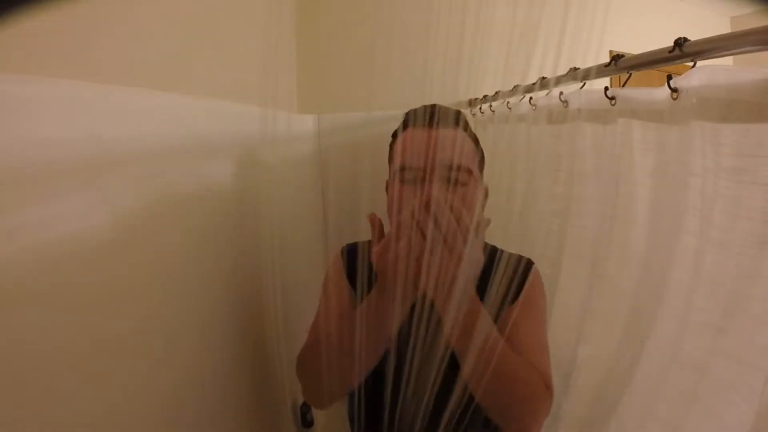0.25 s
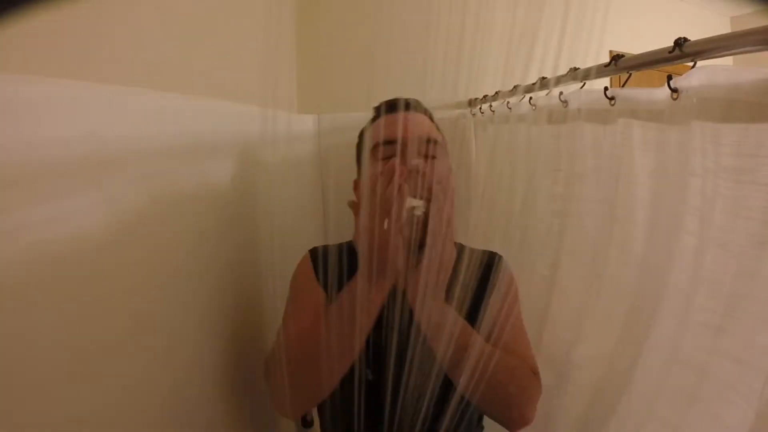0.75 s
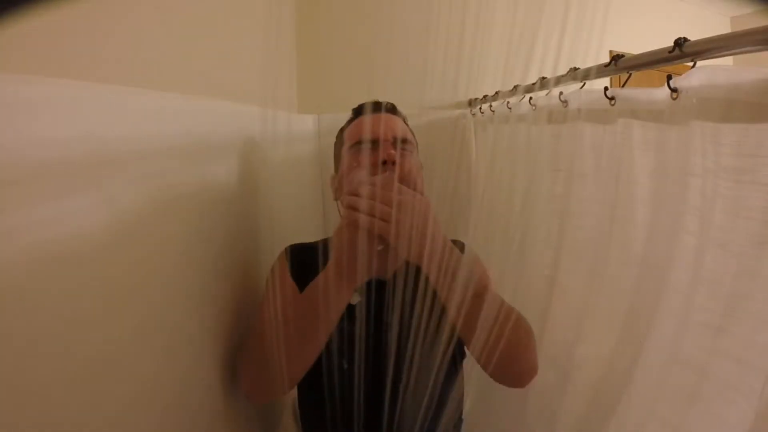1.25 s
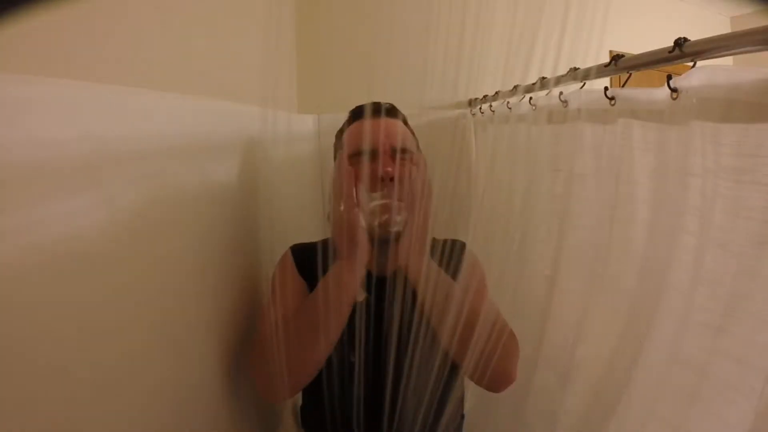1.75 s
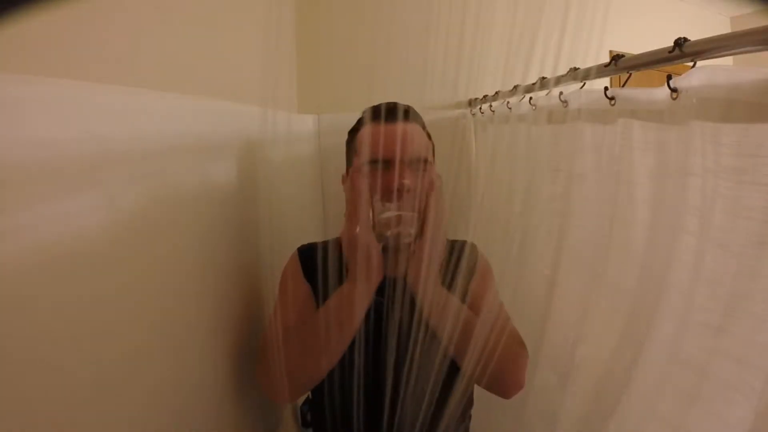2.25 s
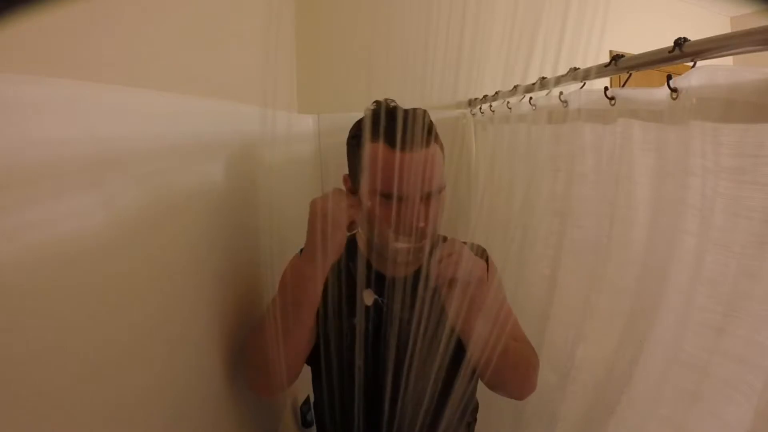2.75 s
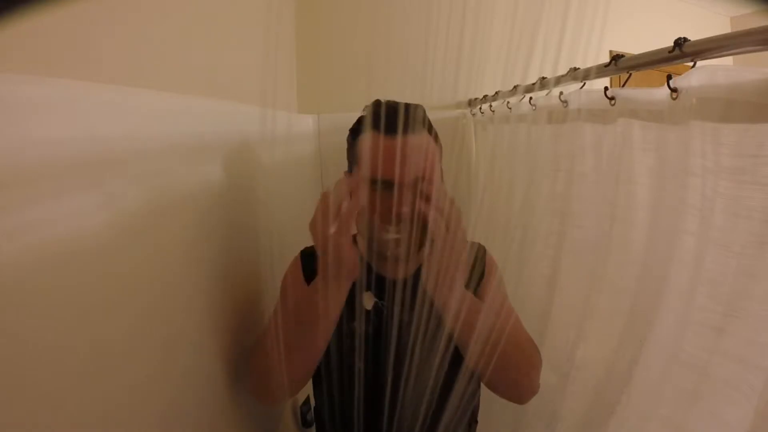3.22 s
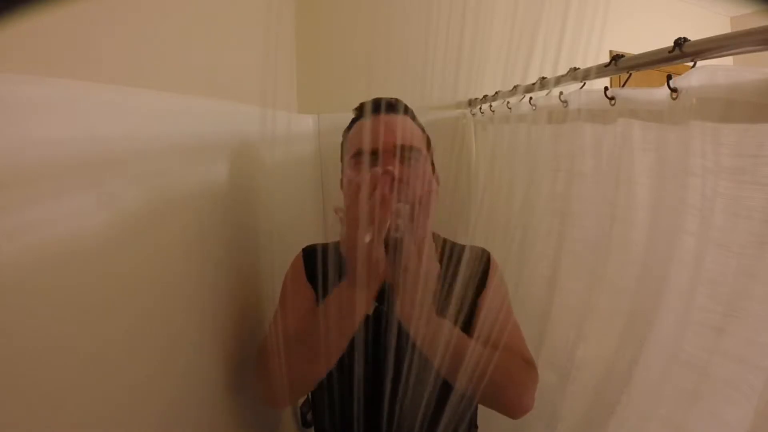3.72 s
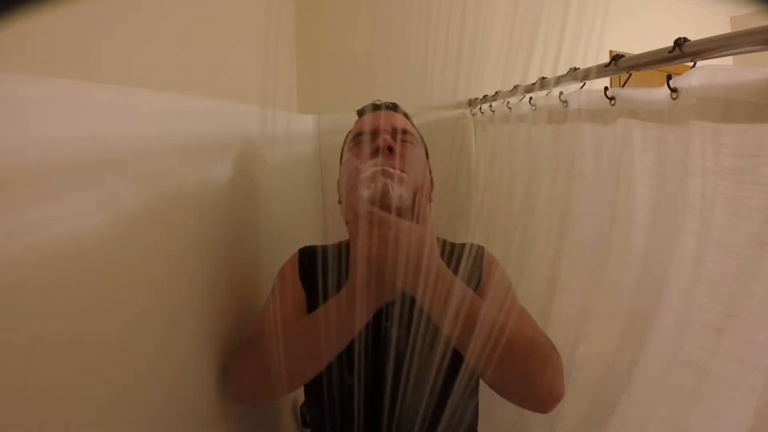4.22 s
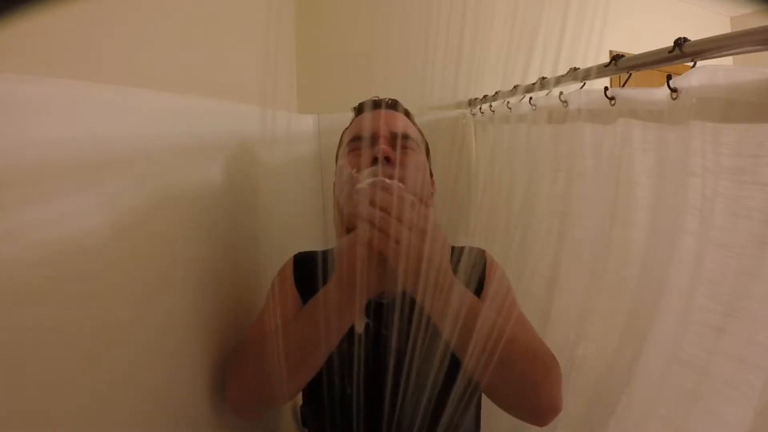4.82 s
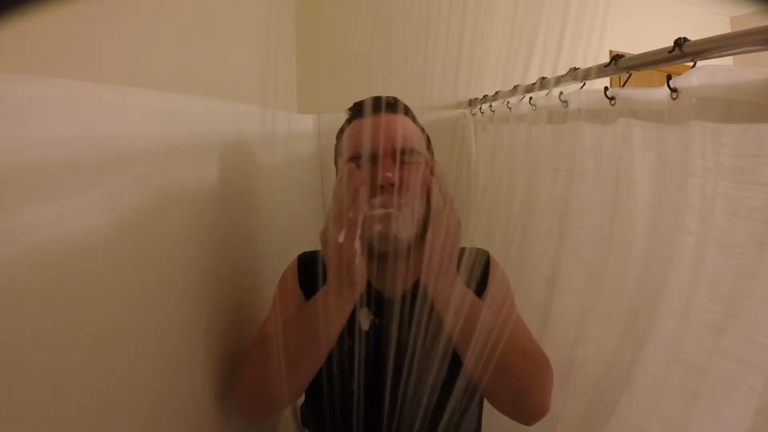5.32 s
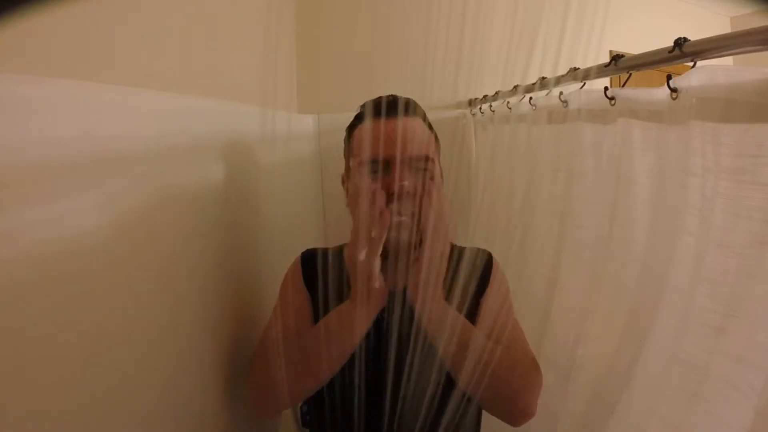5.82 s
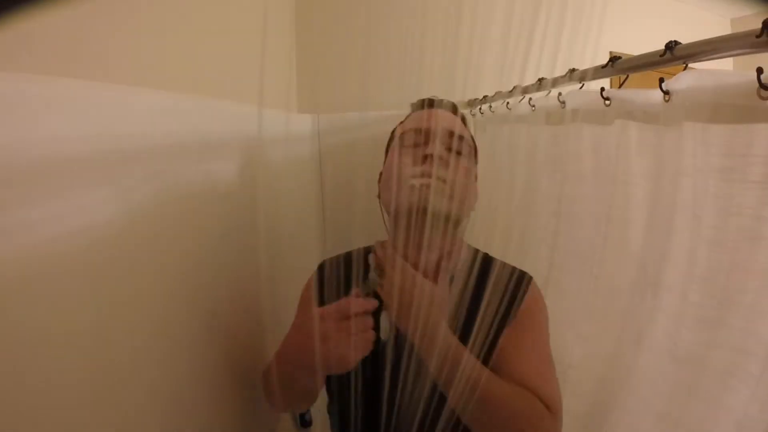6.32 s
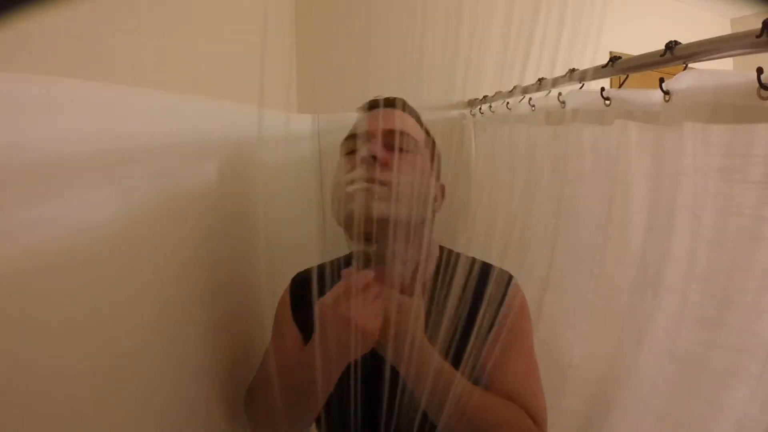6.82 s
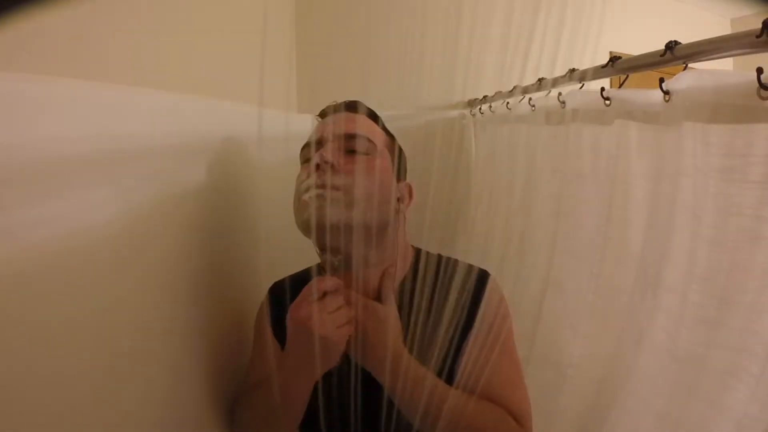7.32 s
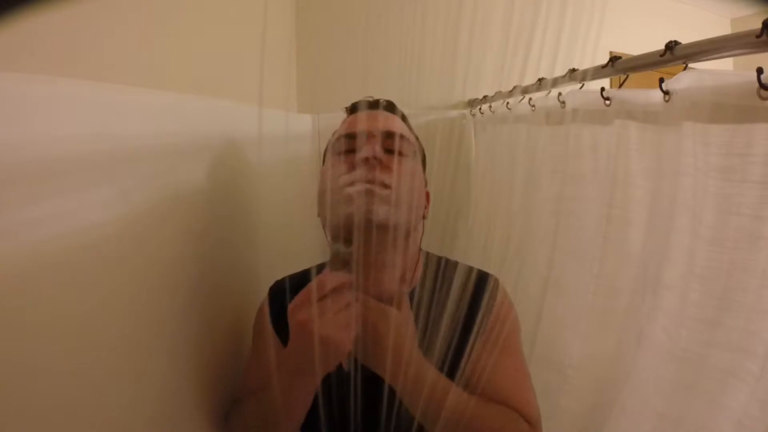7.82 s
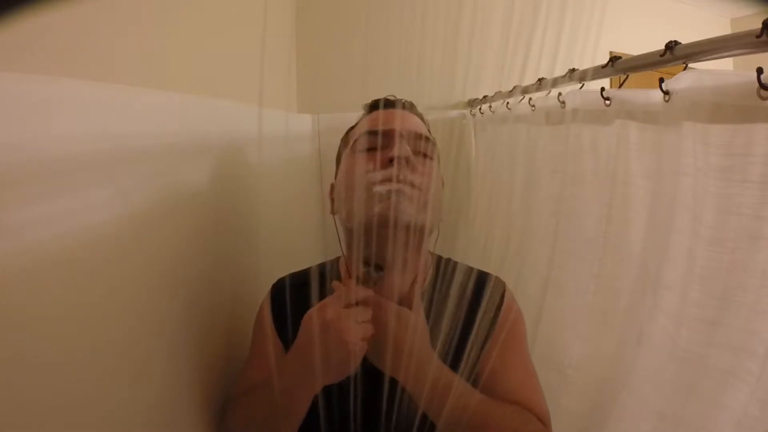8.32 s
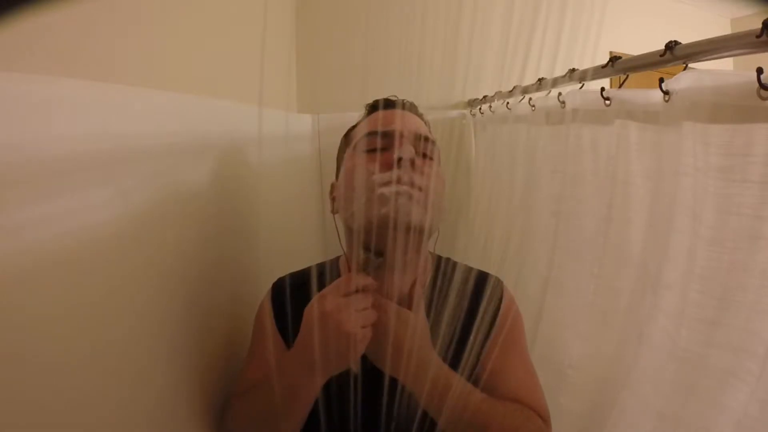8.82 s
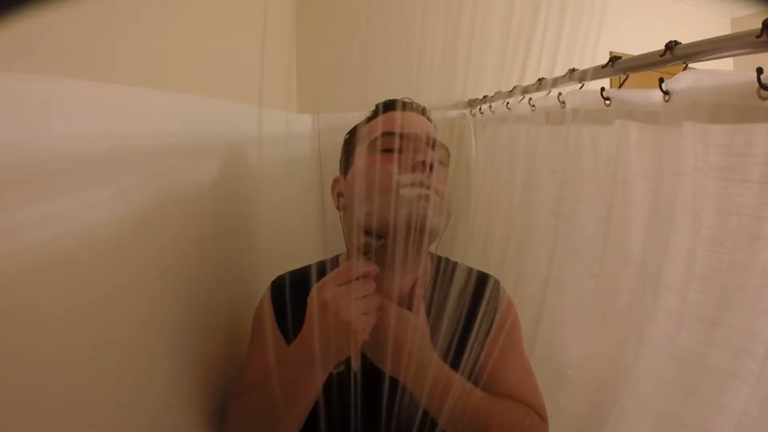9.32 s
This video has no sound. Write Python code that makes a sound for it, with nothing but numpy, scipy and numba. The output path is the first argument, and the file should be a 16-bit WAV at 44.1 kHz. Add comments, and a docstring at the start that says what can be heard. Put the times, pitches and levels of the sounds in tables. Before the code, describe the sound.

Steady shower spray hisses nearby with a hollow ring and thin whistles, over fine pattering and a soft, uneven boom from the tub floor. Someone rinses their face, and water drops from their hands in brief, bright splashes, bunched together early on and then more scattered. Wet lather crackles faintly in between. The microphone is close to the shower head, and the hard walls of the stall add a short echo.

```python
"""The steady, ringing hiss of a shower head close by, in a small stall where someone rinses their face.
Turbulent flow excites the resonances of the head and its nozzles. Drops drum on the modes of the tub
and patter on skin and curtain as broadband impact noise. Water spills from the hands in short splashes,
wet lather crackles, and reflections from the hard walls prolong both briefly."""
import sys
import numpy as np
from scipy import signal
from scipy.fft import rfft, irfft, next_fast_len
from scipy.io import wavfile
from scipy.ndimage import uniform_filter1d
from numba import njit

SR = 44100
rng = np.random.default_rng(int(sys.argv[2]) if len(sys.argv) > 2 else 0)


def to_wav(s):
    """Save 16-bit WAV."""
    ch = np.atleast_2d(s).T  # columns
    pcm = np.round(np.clip(ch, -1, 1) * 32767)  # PCM
    wavfile.write(sys.argv[1], SR, pcm.astype(np.int16))


N = 421155

# Resonances. Each row: frequency in Hz, bandwidth of one filter stage in Hz, relative gain in dB.
HEAD_MODES = [(844, 63, -10.1), (918, 57, -13.8), (999, 36, -14.6), (1053, 20, -19.1), (1140, 65, -2.1),
              (1201, 34, -1.5), (1257, 43, 0.0), (1451, 118, -10.6), (1539, 128, -14.9), (1671, 48, -2.8),
              (1765, 23, -2.7), (1835, 85, -6.2), (1895, 65, -1.5), (1944, 63, -6.6), (2095, 179, -15.8),
              (2172, 27, -4.9), (2303, 50, -5.3), (2364, 32, -2.2), (2424, 43, -4.2), (2540, 49, -12.0),
              (2692, 107, -19.0), (2839, 97, -20.5), (2982, 65, -20.7), (3202, 84, -14.7),
              (3345, 261, -18.2), (3631, 89, -17.6), (3806, 101, -18.1), (4079, 112, -18.2),
              (4389, 142, -19.4)]  # the hollow shower head and its pipe
NOZZLE_MODES = [(5030, 330, -17), (5480, 340, -16), (5622, 57, -0.3), (6000, 110, -12), (6313, 46, 0.0),
                (6420, 110, -11.5), (6890, 193, -9.5), (7365, 340, -19), (7619, 110, -9.5), (7990, 36, -10),
                (8104, 110, -12.5), (8300, 43, -14), (8480, 81, -14.5), (8540, 46, -12.8),
                (8963, 53, -18.5), (9380, 200, -15.5), (9860, 282, -19.5), (12000, 45, -20)]  # thin whistles of the nozzles
TUB_MODES = [(98.4, 1.8, -9), (122.7, 15.3, 0.5), (164.4, 17.5, -10)]  # deep boom of the tub floor
AIR_MODES = [(60.6, 9.8, 0.5), (219.6, 21.4, -3.5), (290, 47, -11.5), (327.3, 22.3, -1),
             (401.3, 18.3, -9.5), (508.5, 50, -18)]  # air enclosed by the stall

# Transient spectra. Each row: frequency in Hz, relative spectral density in dB.
SPRAY_SPECTRUM = [(25, -6.5), (200, -6), (600, -13), (1400, -6.5), (2600, -14.5), (3500, 0), (4700, -23),
                  (6000, -11), (8000, -14.5), (10300, -20.5), (11400, -28), (13500, -27), (15000, -35)]  # falling spray
SLAP_SPECTRUM = [(500, -31), (2000, -2), (3300, 5), (4500, -1.5), (5800, 1.5), (8000, -12), (11000, -23),
                 (15000, -37)]  # bright onset of a splash
GUSH_SPECTRUM = [(1500, -28), (2800, -13), (3400, 7.5), (4100, 5.5), (4900, -17), (7000, -22), (15000, -47)]  # the water that follows it
SPIT_SPECTRUM = [(1000, -18), (4000, -2), (8000, -1), (11000, 3), (13500, -2), (15000, -5)]  # crackle on skin and lather
DULL_TICK_SPECTRUM = [(100, -3), (400, -3), (800, 3), (1500, -8), (4000, -35), (15000, -60)]  # a dull tick

# Transients. Each row: start in seconds, relative level in dB.
SPLASHES = [(2.2844, -48.5), (2.6594, -48), (2.7202, -44), (2.7944, -49), (2.8948, -43.5), (2.9711, -47),
            (3.0525, -47), (3.3628, -44), (3.3894, -47.5), (3.4344, -48), (3.7774, -46.5), (3.7958, -47),
            (4.4812, -44), (4.7844, -48.5), (5.0873, -45.5), (5.7857, -47), (6.1799, -50), (6.2502, -50),
            (6.9247, -49.5), (8.5684, -50.5), (8.8214, -50)]  # water spilling off the hands
SPITS = [(1.0849, -61), (2.4718, -59), (2.8394, -55.5), (3.1757, -58.5), (3.8955, -56.5), (3.9144, -59),
         (4.6853, -57), (5.1642, -55.5), (5.2599, -60), (5.3443, -56), (5.5523, -50), (5.5844, -57),
         (6.3495, -57.5), (7.6136, -59), (7.8774, -59.5)]  # spray striking wet skin and lather
DULL_TICKS = [(5.939, -46.5)]  # one faint, dull tick, like a glitch in the sound

# Swells of the drumming on the tub. Each row: time of the peak in seconds, rise in dB.
TUB_SWELLS = [(2.25, 3.0), (8.37, 3.5)]

FLOW_DB, TUB_DB, SPRAY_DB, AIR_DB = -39.2, -53, -55, -60.5  # base levels of the steady layers
SPLASH_GAIN_DB, SPIT_GAIN_DB = -2, -5.5


def shower_head(nozzle_gain_db=-17, rinse_rise_db=0.33):
    """Forced resonance: turbulence rings the hollow head and whistles in nozzles whose jets flutter."""
    whistles = undb(nozzle_gain_db + 0.38 * wander(rate=14)) * resonant_noise(NOZZLE_MODES)
    return undb(FLOW_DB + rinse_rise_db * rinsing()) * (resonant_noise(HEAD_MODES) + whistles)


def tub(swell_half_width_s=0.26):
    """Modal response: countless drops blur into an uneven drumming of the tub and the enclosed air."""
    t = np.arange(N) / SR
    swell_db = sum(db * np.exp(-((t - peak_s) / swell_half_width_s) ** 2) for peak_s, db in TUB_SWELLS)
    boom = resonant_noise(TUB_MODES)
    even_boom = boom / np.sqrt(uniform_filter1d(boom ** 2, size=SR // 3))
    drumming = undb(TUB_DB + swell_db + 0.97 * wander(rate=3)) * even_boom
    return drumming + undb(AIR_DB) * resonant_noise(AIR_MODES)


def spray(rinse_rise_db=0.5):
    """Shot noise: drops patter on skin and curtain in clumps, harder while the hands are in the way."""
    impacts = drops(rate=12000, spread_db=2.0) * undb(1.25 * wander(rate=30))
    return undb(SPRAY_DB + rinse_rise_db * rinsing()) * colour(impacts, SPRAY_SPECTRUM)


def splashes(gush_gain_db=-2.2):
    """Impact noise: a handful of water slaps down brightly and the rest gushes after, lower and longer."""
    slap_envelope = bursts(SPLASHES, rise_s=0.0029, decay_s=0.013)
    gush_envelope = bursts(SPLASHES, rise_s=0.0052, decay_s=0.02)
    slap = colour(drops(rate=3500, spread_db=2.0) * slap_envelope, SLAP_SPECTRUM)
    gush = colour(drops(rate=5200, spread_db=3.5) * gush_envelope, GUSH_SPECTRUM)
    return undb(SPLASH_GAIN_DB) * (slap + undb(gush_gain_db) * gush)


def spits(strays_per_s=1.5):
    """Brief impacts are rich in treble: jets crackle on wet skin, with fainter strays at random times."""
    stray_starts = np.flatnonzero(rng.random(N) < strays_per_s / SR)
    stray_relative_db = -64 + 1.5 * rng.standard_normal(N)[stray_starts]
    strays = list(zip(stray_starts / SR, stray_relative_db))
    envelope = bursts(list(SPITS) + strays, rise_s=0.0015, decay_s=0.012)
    impacts = drops(rate=12000, spread_db=3.0) * envelope
    return undb(SPIT_GAIN_DB) * colour(impacts, SPIT_SPECTRUM)


def dull_tick():
    """A short transient: a faint, dull tick of noise, like a glitch, dies within a few milliseconds."""
    envelope = bursts(DULL_TICKS, rise_s=0.001, decay_s=0.002)
    return colour(rng.standard_normal(N) * envelope, DULL_TICK_SPECTRUM)


def stall(direct, t60_s=0.34, tail_gain_db=-4.5):
    """Reverberation: reflections from close hard walls merge into a short exponential tail."""
    t = np.arange(SR // 2) / SR
    decay = np.exp(-np.log(1000) * t / t60_s)
    tail = rng.standard_normal(len(t)) * decay * (t > 0.003)  # first reflection after 3 ms
    reflected = signal.fftconvolve(direct, tail / np.linalg.norm(tail))[:N]
    return (direct + undb(tail_gain_db) * reflected) / np.hypot(1, undb(tail_gain_db))


def rinsing(start_s=1.7, end_s=6.2, ramp_s=0.9):
    """A trapezoidal envelope, 0 to 1: the hands move into the spray, stay, and move out."""
    t = np.arange(N) / SR
    return np.clip(np.minimum(t - start_s, end_s - t) / ramp_s, 0, 1)


def resonant_noise(modes):
    """Modal superposition: each mode filters its own random force through two resonators in series."""
    total = 0
    for hz, width_hz, db in modes:
        force = rng.random(N) - 0.5
        first_stage = resonate(force, float(hz), float(width_hz))
        total = total + undb(db) * resonate(first_stage, float(hz), float(width_hz))
    return unit_rms(total)


@njit
def resonate(force, hz, width_hz):
    """A damped oscillator, as a state-variable band-pass with a gain of 1 at its centre."""
    response = np.empty(len(force))
    band, low = 0., 0.
    step, damping = np.tan(np.pi * hz / SR), width_hz / hz
    for i in range(len(force)):
        velocity = (band + step * (force[i] - low + 1e-18)) / (1 + step * (step + damping))
        band = 2 * velocity - band
        low += 2 * step * velocity
        response[i] = damping * velocity
    return response


def drops(rate, spread_db):
    """A Poisson process: on average `rate` impacts a second, many small and a few large."""
    lands = rng.random(N) < rate / SR
    strength = undb(spread_db * np.minimum(rng.exponential(size=N), 5))
    return unit_rms(lands * strength * rng.choice([-1, 1], N))


def bursts(events, rise_s, decay_s):
    """Incoherent addition: the envelopes of quickly rising, decaying events sum in power."""
    t = np.arange(SR // 3) / SR
    shape = (1 - np.exp(-t / rise_s)) * np.exp(-t / decay_s)
    power = np.zeros(N)
    for start_s, db in events:
        start = int(start_s * SR)
        power[start:start + len(t)] += (undb(db) * shape[:N - start] / shape.max()) ** 2
    return np.sqrt(power)


def colour(x, spectrum):
    """Spectral shaping that conserves the power of a white input."""
    size = next_fast_len(N)
    hz, db = np.transpose(spectrum)
    bin_hz = np.fft.rfftfreq(size, 1 / SR)
    gain = undb(np.interp(np.log(bin_hz + 1), np.log(hz), db))
    return irfft(rfft(x, size) * unit_rms(gain), size)[:N]


def wander(rate):
    """Random modulation: `rate` steps a second, smoothed twice and scaled to an rms of 1."""
    hold = int(SR / rate)
    steps = np.repeat(rng.standard_normal(4096)[:N // hold + 1], hold)
    return unit_rms(uniform_filter1d(uniform_filter1d(steps, hold), hold)[:N])


def undb(db):
    """Amplitude ratio of a level in decibels."""
    return 10 ** (np.asarray(db) / 20)


def unit_rms(x):
    """Normalisation to a mean power of 1."""
    return x / np.sqrt(np.mean(x ** 2))


def scene():
    """Superposition in one channel: the near shower head over the water landing in the stall."""
    return (shower_head() + tub() + spray() + stall(splashes() + spits()) + dull_tick())[None]


def record(dry, cutoff_hz=15300):
    """Band limiting: a steep elliptic low-pass removes the highest treble."""
    return signal.sosfilt(signal.ellip(12, 0.2, 80, cutoff_hz, fs=SR, output="sos"), dry)


dry = scene()
out = record(dry)
to_wav(out)
```